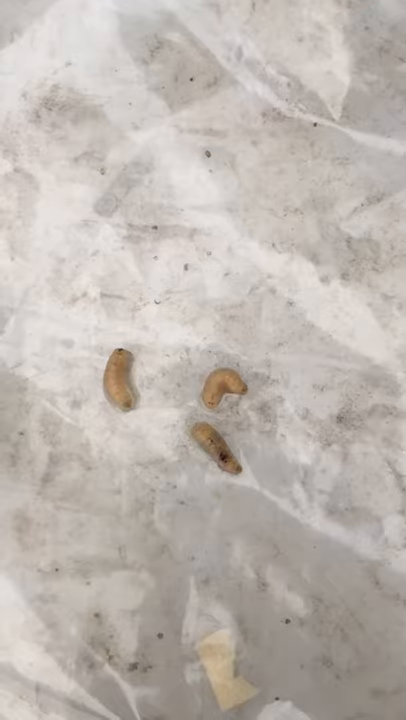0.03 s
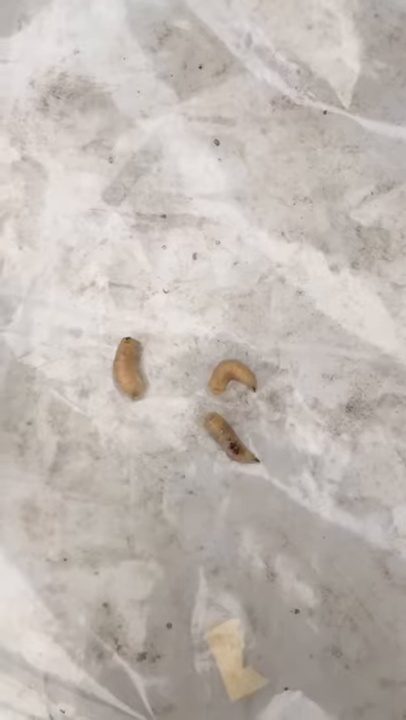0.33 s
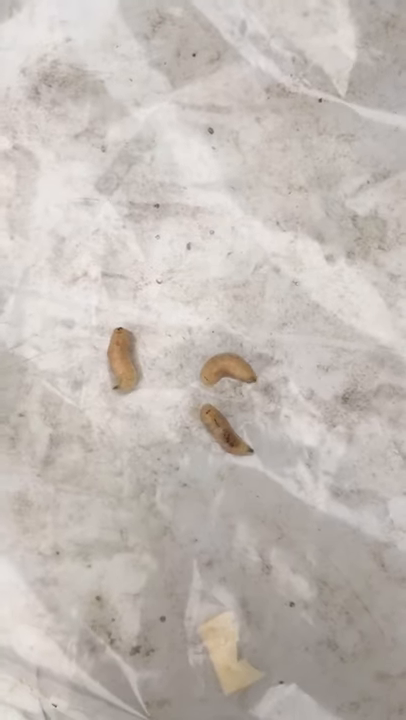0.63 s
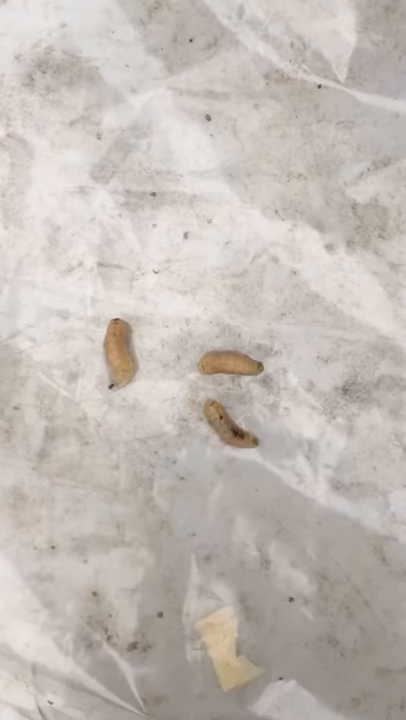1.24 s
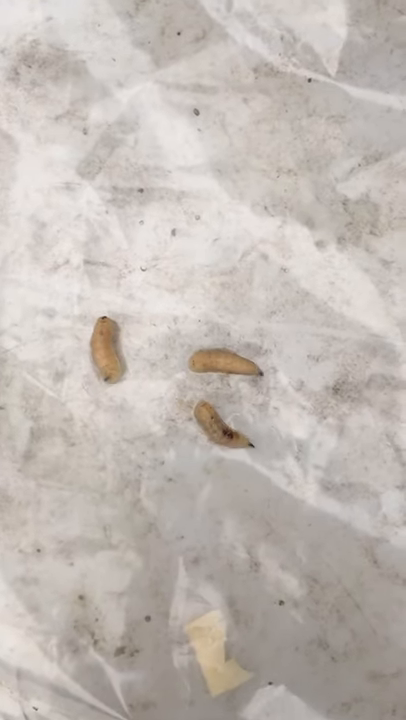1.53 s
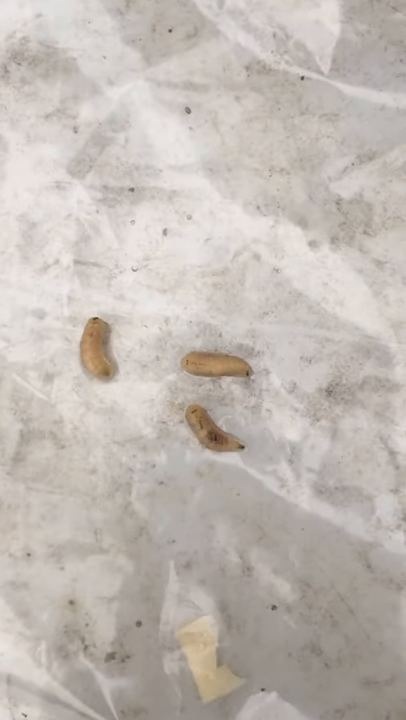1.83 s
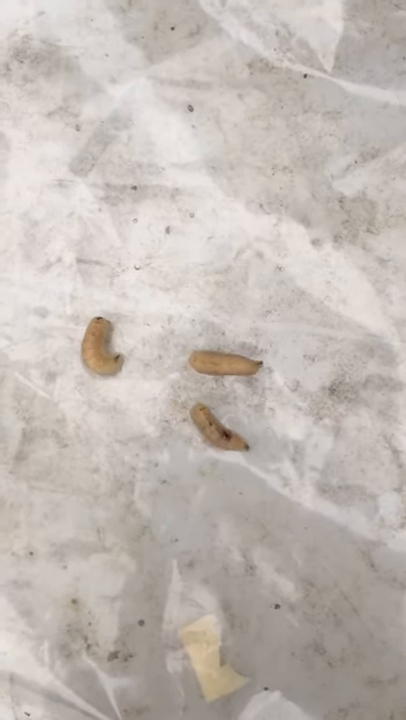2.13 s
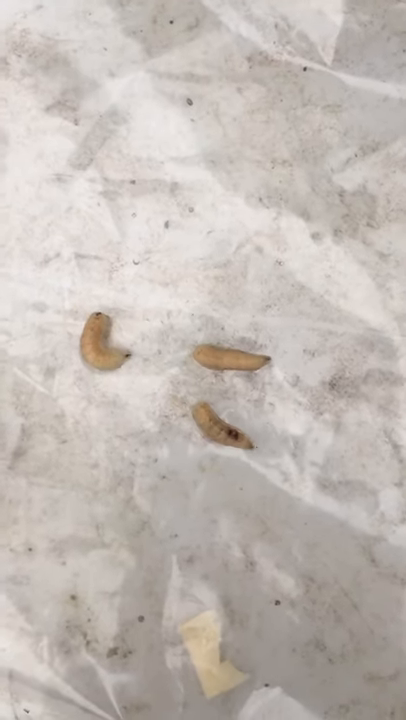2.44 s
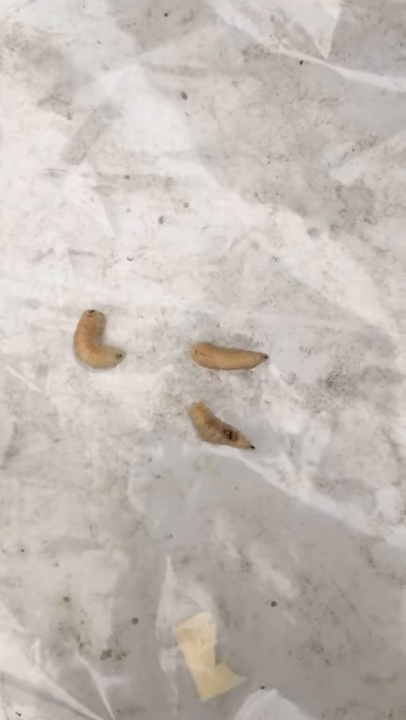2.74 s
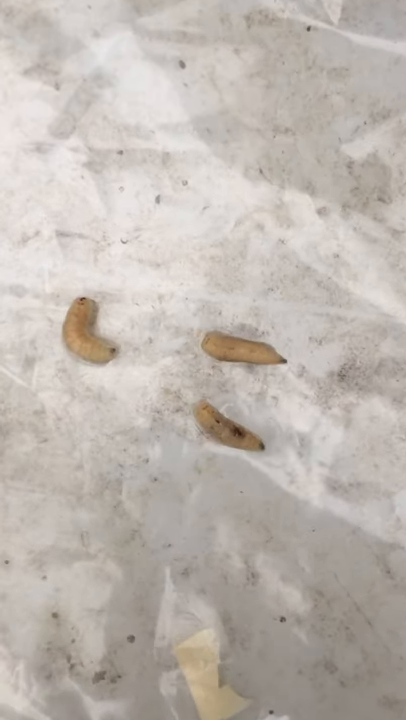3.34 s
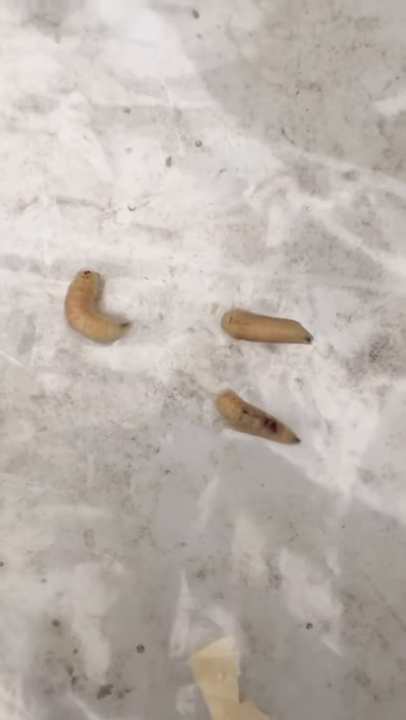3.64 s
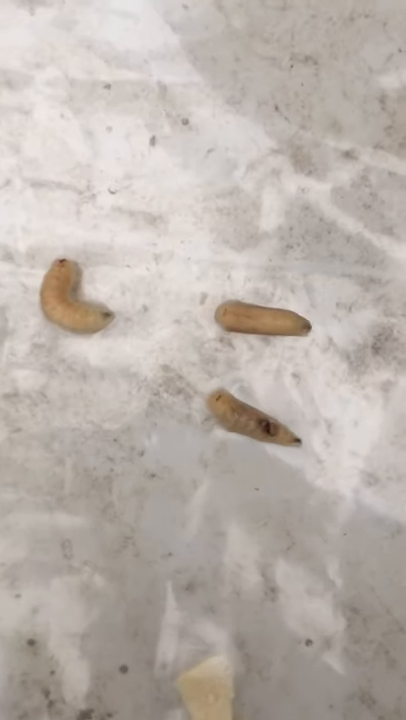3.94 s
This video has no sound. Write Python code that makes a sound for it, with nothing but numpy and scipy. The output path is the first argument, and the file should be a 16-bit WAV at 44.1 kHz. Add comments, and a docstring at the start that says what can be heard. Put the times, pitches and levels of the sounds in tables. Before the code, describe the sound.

Small sticky clicks from larvae squirming on plastic sheeting, with low hum and soft microphone bumps

```python
"""Sticky ticks in a quiet room

A low machine hum, rumble and faint hiss are heard through a handheld camera. The hand bumps the
camera a few times, shaking its body, and brushes over it, making friction noise. Close by sound
small sticky ticks: stick-slip motion, each a few tiny slips ringing or squeaking at one pitch.
The sound switches on just after the start."""
import sys
import numpy as np
from scipy import signal
from scipy.fft import rfft, irfft
from scipy.io import wavfile
from scipy.ndimage import uniform_filter1d

SR = 44100
rng = np.random.default_rng(int(sys.argv[2]) if len(sys.argv) > 2 else 0)


def dump_mix(stems):
    """Bounce the given channels to the path in sys.argv[1] as a 16-bit WAV at rate SR."""
    frames = np.atleast_2d(stems).T  # one column per channel
    limited = np.clip(frames, -1, 1)  # hard clip at full scale
    pcm = np.round(limited * 32767).astype(np.int16)
    wavfile.write(sys.argv[1], SR, pcm)


N = 176400
T = np.arange(N) / SR
BIN_HZ = np.fft.rfftfreq(N, 1 / SR)
BAND_LIMIT_HZ = 15900


def amp(db):
    """Amplitude ratio of a level in decibels."""
    return 10 ** (np.asarray(db) / 20)


def unit(x):
    """Normalisation to an rms of one."""
    return x / np.sqrt(np.mean(abs(x) ** 2) + 1e-20)


def add(mix, start_s, sound):
    """Superposition of a sound on the mix."""
    part = mix[max(round(start_s * SR), 0):][:len(sound)]
    part += sound[:len(part)]


def envelope(points):
    """Gain that moves linearly in decibels between (time_s, level_db) points."""
    return amp(np.interp(T, *np.transpose(points)))


def noise(spectrum):
    """Spectral shaping of white noise by (frequency_hz, density_db) points."""
    hz, db = np.transpose(spectrum)
    gain = amp(np.interp(np.log(BIN_HZ + 1), np.log(hz), db))
    return unit(irfft(rfft(rng.standard_normal(N)) * gain, N))


def drift(rate_hz):
    """Low-pass noise: a slow random wandering about zero."""
    lowpass = np.exp(-(BIN_HZ / rate_hz) ** 2) * (BIN_HZ > 0)
    return unit(irfft(rfft(rng.standard_normal(N)) * lowpass, N))


def patchy(x, depth_db, patch_s, patch_hz, size=2048):
    """Random modulation in time and frequency: narrow regions of the spectrum come and go."""
    frames = dict(nperseg=size, noverlap=size * 3 // 4)
    spectra = signal.stft(x, **frames)[2]
    field = rng.standard_normal(spectra.shape)
    for axis, span in enumerate((patch_hz * size / SR, patch_s * SR / (size // 4))):
        field = uniform_filter1d(field, max(round(span), 1), axis)
    return unit(signal.istft(spectra * amp(depth_db * unit(field)), **frames)[1][:N])


def ring(x, hz, width_hz):
    """Resonance: two identical band-pass stages in cascade, each width_hz wide."""
    b, a = signal.iirpeak(min(hz, SR / 2 - 1), hz / width_hz, SR)
    return signal.lfilter(b, a, signal.lfilter(b, a, x))


# Relative spectra of the four noises: frequency_hz, density_db
AIR_SPECTRUM = [(20, -77), (30, -31.5), (42, -16.5), (70, -1), (110, 0), (150, 0), (195, -7.5), (250, -16),
                (340, -22), (430, -17.5), (540, -32.5), (920, -28), (1400, -36), (2200, -49), (8000, -87)]
RUMBLE_SPECTRUM = [(20, -15.5), (30, -20.5), (40, -1.5), (60, 4), (90, 1.5), (200, -46.5), (500, -75)]
RUSH_SPECTRUM = [(100, -24), (210, 7.5), (290, -1.5), (400, -1), (500, -7.5), (740, -11.5), (880, -17),
                 (1200, -23.5), (1800, -21.5), (6000, -47)]
HISS_SPECTRUM = [(100, 3.5), (1500, 2.5), (2800, 1.5), (4300, 0.5), (4900, -2.5), (5500, -0.5), (7800, -4),
                 (9600, -4), (11200, -6.5), (16000, -8.5)]
# Envelopes of the rumble and the rush: time_s, level_db
RUMBLE_ENVELOPE = [(0, -54.5), (.6, -62.5), (1.3, -71), (1.7, -75), (2.3, -61.5), (3.2, -66.5), (4, -67)]
RUSH_ENVELOPE = [(0, -75.5), (1.5, -75), (2.1, -62.5), (2.5, -63.5), (2.9, -62), (3.3, -62.5), (4, -64)]
def room_tone(air_db=-53.5, hiss_db=-72.5):
    """Modulated noise: room air, lumpy hand rumble, a hollow rush that swells, microphone hiss."""
    air = amp(air_db + 1.43 * drift(23)) * noise(AIR_SPECTRUM)
    rumble = envelope(RUMBLE_ENVELOPE) * amp(3.5 * drift(10)) * noise(RUMBLE_SPECTRUM)
    rush = envelope(RUSH_ENVELOPE) * patchy(noise(RUSH_SPECTRUM), depth_db=6, patch_s=.1, patch_hz=65)
    hiss_gain = amp(hiss_db + .9 * drift(34))
    hiss = hiss_gain * patchy(noise(HISS_SPECTRUM), depth_db=1.8, patch_s=.04, patch_hz=260, size=512)
    return air + rumble + rush + hiss


# Partials of the machine hum: frequency_hz, level_db, waver_ratio
HUM_PARTIALS = [(75.5, -60, 0.8), (91.1, -61.5, 0.86), (144, -61, 0.4), (162.6, -53.5, .15),
                (309.6, -80.5, 0.54), (379.7, -79.5, 1), (553, -86, 0.67), (731, -85.5, 0.82)]
# Gain applied to all the partials: time_s, gain_db
HUM_ENVELOPE = [(0, -1), (.7, -2.5), (1.2, 1.5), (2.8, 1), (4, -1.5)]
def machine_hum(waver_hz=7.7):
    """A line spectrum whose partials waver by random amplitude and phase modulation."""
    tones = np.zeros(N)
    for hz, db, waver in HUM_PARTIALS:
        modulation = 1 + waver * (drift(waver_hz) + 1j * drift(waver_hz))
        carrier = np.exp(2j * np.pi * (hz * T + rng.random()))
        tones += amp(db) * unit((modulation * carrier).real)
    return tones * envelope(HUM_ENVELOPE)


# Faint hollow tones: peak_s, level_db, pitch_hz, width_hz, fade_s
RESONANCES = [(0.373, -73, 946, 28, .2), (1.55, -81, 1445, 90, 0.77), (2.242, -64.5, 387, 34, 0.42),
              (2.28, -60, 232, 28, 0.043), (2.47, -77.5, 1430, 33, 0.13), (2.672, -76.5, 1180, 76, 0.18),
              (2.708, -73, 447, 59, 0.46), (2.814, -71, 642, 25, 0.044), (2.88, -73, 530, 24, 0.064),
              (3.13, -62.5, 410, 24, 0.063), (3.1, -67.5, 309, 11, 1), (3.385, -69, 721, 14, 0.06),
              (3.386, -76, 4030, 190, 0.046), (3.882, -70.5, 760, 52, 0.096)]
def hollow_tones(flutter_db=3.5, flutter_hz=9):
    """Narrow resonances of the background, excited by noise, swell and fade."""
    out = np.zeros(N)
    for peak_s, db, hz, width_hz, fade_s in RESONANCES:
        swell = np.exp(-((T - peak_s) / fade_s) ** 2)
        flutter = amp(flutter_db * drift(flutter_hz))
        tone = swell * flutter * ring(rng.standard_normal(N), hz, 2 * width_hz)
        out += amp(db) * tone * np.linalg.norm(swell) / np.linalg.norm(tone)
    return out


# Bumps of the hand: peak_s, level_db, pitch_hz, fade_s
HAND_BUMPS = [(0.493, -41.5, 59, 0.019), (1.529, -43, 64.6, 0.021), (2.079, -44, 69, 0.012),
              (2.271, -51, 49, 0.045), (2.577, -35, 118, 0.0063), (2.657, -34.5, 136, 0.007),
              (2.654, -40, 65, 0.011), (2.679, -43, 46, 0.019), (2.919, -36.5, 95, 0.0064),
              (2.94, -47, 46, .018), (3.002, -44, 56.3, 0.016), (3.607, -40.5, 89, .008)]
def hand_bumps():
    """Forced vibration: each bump pushes the camera body through a cycle or two."""
    out = np.zeros(N)
    for peak_s, db, hz, fade_s in HAND_BUMPS:
        t = T - peak_s
        out -= amp(db) * np.exp(-abs(t) / fade_s) * np.cos(2 * np.pi * hz * t)
    return out


# Strokes of skin on the camera: peak_s, level_db, centre_hz, width_octaves, fade_s
SKIN_STROKES = [(0.177, -72, 4480, 1.1, 0.018), (0.505, -67, 11100, 0.17, 0.0068),
                (0.516, -71, 5200, 1, 0.05), (0.605, -73, 5500, 0.54, 0.014),
                (0.667, -68, 5700, 0.55, 0.014), (0.722, -73, 10900, 1.2, 0.024),
                (0.746, -75, 2700, 0.58, 0.058), (2.082, -69.5, 14600, 0.47, .02),
                (2.268, -70.5, 13900, 1, 0.021), (2.334, -75, 13100, 0.64, 0.0077),
                (2.378, -71, 13900, 0.71, 0.02), (2.53, -73, 13300, 0.66, 0.0099),
                (3.053, -75.5, 13200, 0.87, 0.066), (3.269, -73, 15000, 0.36, 0.0066),
                (3.369, -76.5, 12000, 1, 0.091), (3.6, -76, 5200, .5, 0.016),
                (3.69, -68, 10000, 0.96, 0.0034), (3.788, -72, 10900, 0.98, .006),
                (3.965, -74, 10600, 1.8, 0.12)]
def skin_brushes():
    """Sliding friction makes soft swells of grainy treble noise."""
    out = np.zeros(N)
    friction = rfft(patchy(rng.standard_normal(N), depth_db=3, patch_s=.006, patch_hz=700, size=256))
    for peak_s, db, centre_hz, octaves, fade_s in SKIN_STROKES:
        band = np.exp(-.5 * (np.log2((BIN_HZ + 1) / centre_hz) / octaves) ** 2)
        swell = np.exp(-abs((T - peak_s) / fade_s) ** 1.5)
        out += amp(db) * swell * unit(irfft(friction * band * (BIN_HZ < BAND_LIMIT_HZ), N))
    return out


def tick(db, hz, length_s, width_hz, slips_per_s=1500, lock_width_hz=300, snap_db=-14, size=4096):
    """Stick-slip excites a resonance; the narrower it is, the more the slips lock into a squeak."""
    t = np.arange(size) / SR
    slip_chance = slips_per_s / SR
    slipping = rng.random(2 * size) < slip_chance  # the first half lets the filters settle
    slips = rng.standard_normal(2 * size) * (np.sqrt(slip_chance) + slipping)  # roughness plus pulses
    ringing = unit(ring(slips, hz, 2 * width_hz)[size:])
    snap_band_hz = np.minimum(hz * np.array((.9, 2.8)), BAND_LIMIT_HZ)
    snap = unit(signal.lfilter(*signal.butter(2, snap_band_hz, "band", fs=SR), slips)[size:])
    jitter = .012 * unit(uniform_filter1d(rng.standard_normal(size), size=100))
    squeak = unit(np.sin(2 * np.pi * np.cumsum(hz * (1 + jitter)) / SR))
    locked = np.exp(-width_hz / lock_width_hz)
    body = np.sqrt(locked) * squeak + np.sqrt(1 - locked) * ringing
    shape = np.minimum(t / .0025, 1) * np.exp(-(t / length_s) ** 3)
    sound = shape * (body + amp(snap_db) * snap)
    return amp(db) * sound * np.linalg.norm(shape) / np.linalg.norm(sound)


# The clear sticky ticks: start_s, level_db, pitch_hz, length_s, width_hz
STICKY_TICKS = [(0.184, -59, 1974, 0.013, 261), (0.507, -64.5, 3210, 0.0097, 400),
                (0.516, -63.5, 2400, 0.022, 280), (0.76, -64, 1820, 0.014, 700),
                (.762, -70.5, 3020, 0.021, 600), (0.897, -71.5, 4410, 0.039, 320),
                (1.192, -69, 2740, 0.0075, 800), (1.199, -66, 1510, 0.015, 300),
                (1.427, -59.5, 3920, 0.0071, 400), (1.449, -72.5, 3420, 0.028, 150),
                (1.475, -80, 4420, 0.04, 100), (1.825, -56.5, 3094, 0.0087, 119),
                (1.826, -65, 1443, 0.014, 200), (1.959, -65, 1390, 0.010, 200),
                (2.009, -67.5, 5450, 0.0079, 600), (2.164, -65.5, 4070, 0.0088, 350),
                (2.316, -73, 4480, 0.052, 400), (2.451, -69, 2460, 0.012, 199),
                (2.517, -63, 5440, 0.003, 400), (2.65, -69, 5000, 0.025, 1300),
                (2.835, -73, 4460, 0.026, 400), (2.881, -67, 4070, 0.0093, 250),
                (2.888, -73, 4550, 0.019, 450), (3.07, -65.5, 8230, 0.012, 2540),
                (3.207, -70, 8940, 0.01, 900), (3.555, -71, 6150, 0.011, 258),
                (3.599, -56, 2533, 0.013, 348), (3.613, -57.5, 2480, 0.0085, 200),
                (3.622, -74, 4200, 0.021, 250), (3.778, -55, 3030, 0.004, 400),
                (3.781, -54.5, 3077, 0.0088, 229), (3.917, -62, 3300, 0.0083, 700),
                (3.917, -61, 4750, 0.017, 1210), (3.98, -60, 3550, 0.014, 604)]
def sticky_ticks(faint_per_s=16, faint_db=-81.5, spread_db=3, low_hz=2085, high_hz=5560):
    """Intermittent stick-slip: clear ticks among a random scatter of faint ones."""
    out = np.zeros(N)
    for start_s, db, hz, length_s, width_hz in STICKY_TICKS:
        add(out, start_s, tick(db, hz, length_s, width_hz))
    for when, pitch, force, length in rng.random((round(faint_per_s * N / SR), 4)):
        db = faint_db + spread_db * (2 * force - 1)
        hz = low_hz * (high_hz / low_hz) ** pitch
        add(out, when * N / SR, tick(db, hz, length_s=.028 * (.5 + length), width_hz=420))
    return out


def reverberation(x, t60_s=.14, level_db=-8):
    """Diffuse reflections: convolution with a short, exponentially decaying noise tail."""
    t = T[:SR // 2]
    tail = rng.standard_normal(len(t)) * amp(-60 * t / t60_s)
    return amp(level_db) * signal.fftconvolve(x, tail / np.linalg.norm(tail))[:N]


def scene():
    """Superposition of the background, the handling sounds and the ticks with their reverberation."""
    background = room_tone() + machine_hum() + hollow_tones()
    handling = hand_bumps() + skin_brushes()
    ticks = sticky_ticks()
    return (background + handling + ticks + reverberation(ticks))[None]


def record(dry):
    """Filtering and gating: the microphone port dulls one band; the sound switches on, band-limited."""
    notch_hz, notch_width_hz, notch_depth = 10350, 800, .44
    port = signal.lfilter(*signal.iirpeak(notch_hz, notch_hz / notch_width_hz, SR), dry)
    switch_on = np.clip((T - .083) / .002, 0, 1)
    lowpass = signal.firwin(511, BAND_LIMIT_HZ, window=("kaiser", 9), fs=SR)
    return signal.oaconvolve((dry - notch_depth * port) * switch_on, lowpass[None], "same")


dry = scene()
out = record(dry)
dump_mix(out)
```